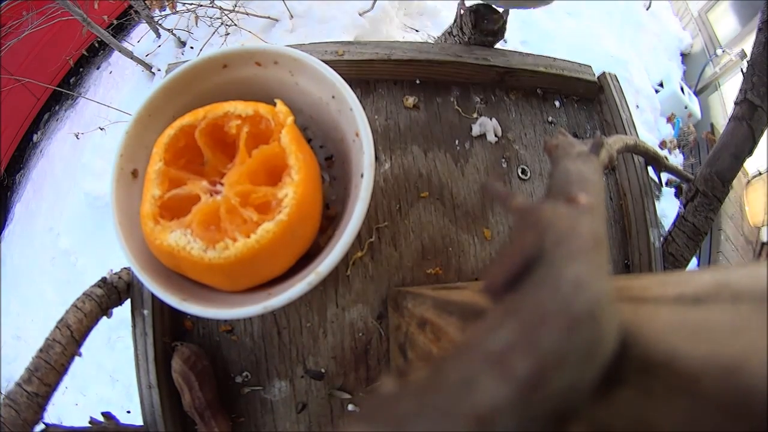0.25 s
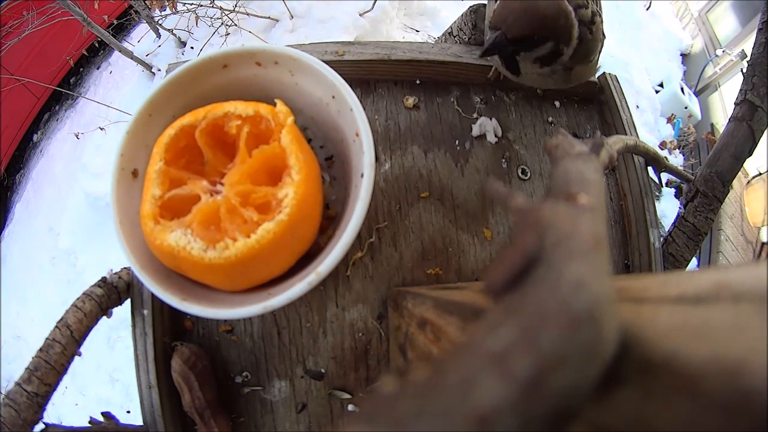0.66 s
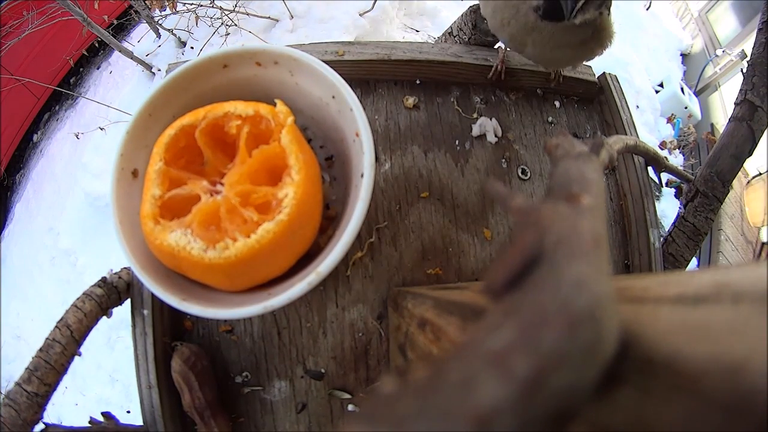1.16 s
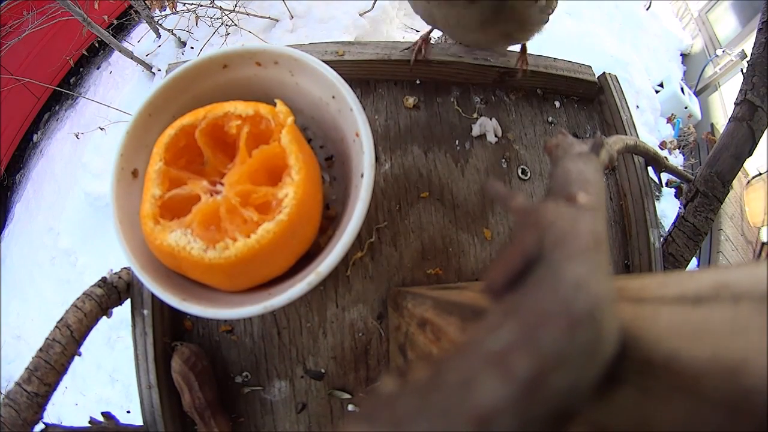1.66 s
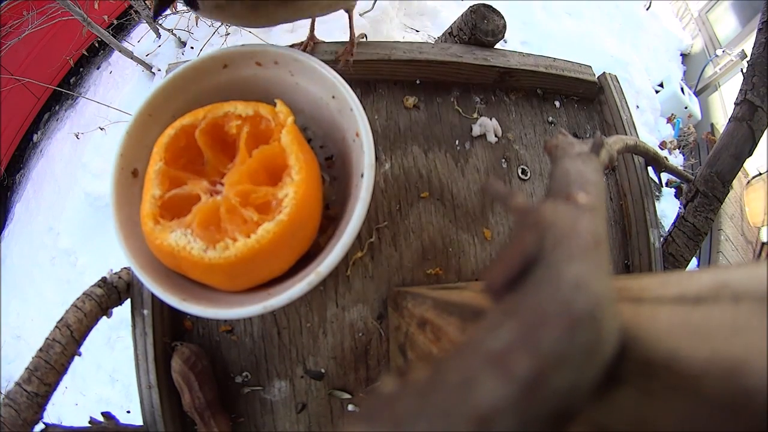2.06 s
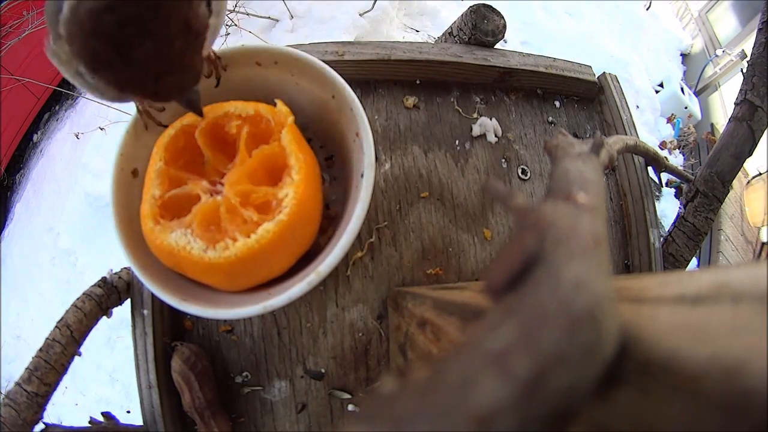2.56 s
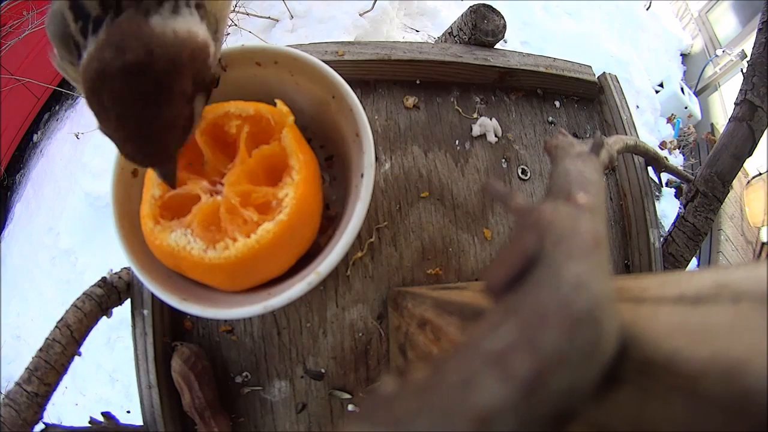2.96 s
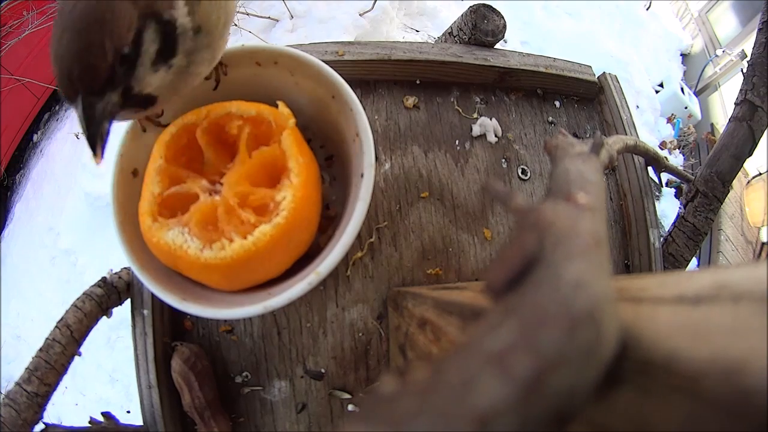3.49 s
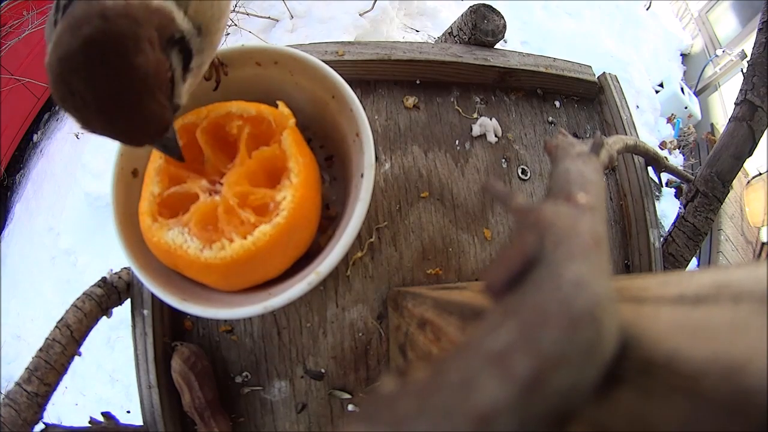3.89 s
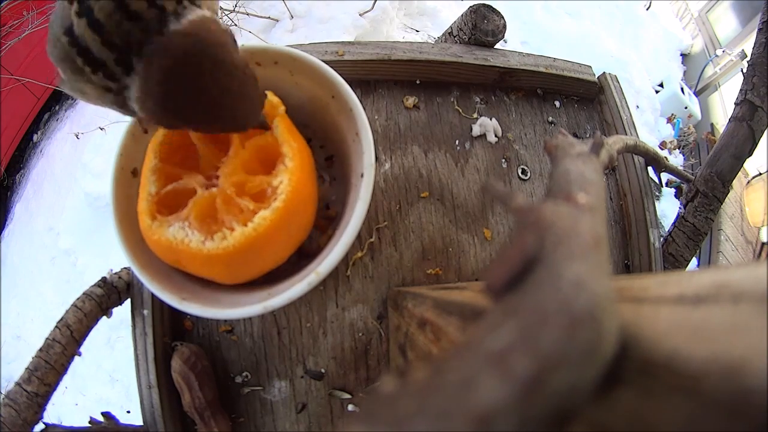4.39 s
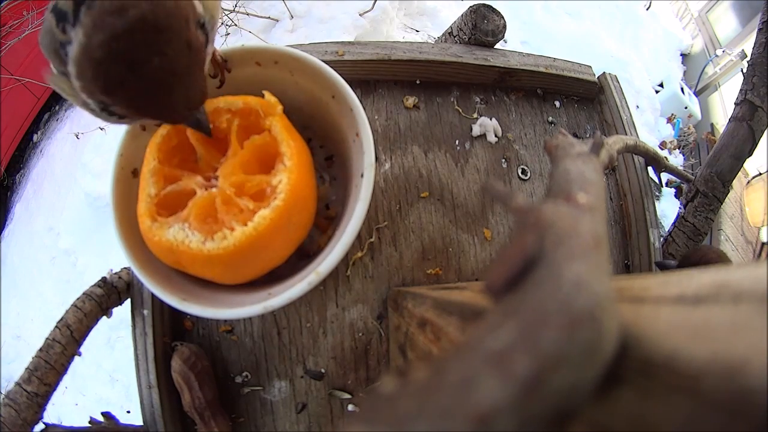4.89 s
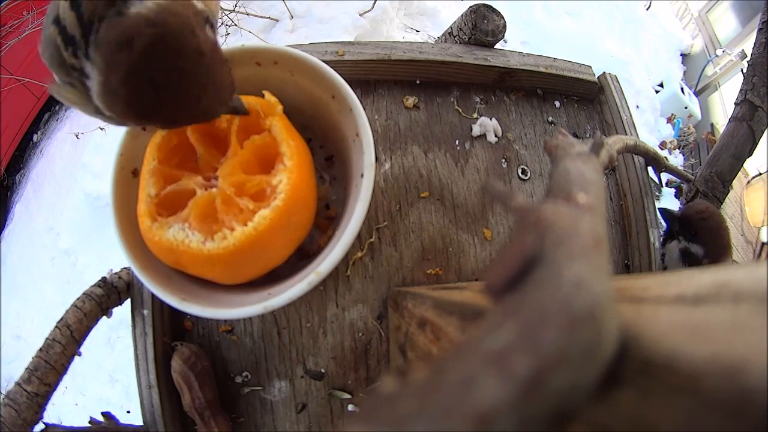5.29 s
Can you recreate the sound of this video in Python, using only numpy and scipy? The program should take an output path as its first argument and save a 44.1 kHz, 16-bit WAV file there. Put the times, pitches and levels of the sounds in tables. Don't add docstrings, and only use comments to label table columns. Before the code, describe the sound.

The first half second is silent; then quiet outdoor hiss and a faint low hum start abruptly with a small tap at 0.55 s. Soft thumps come near 0.8 and 1.0 s. From 1.6 to 1.95 s a bird hops over the wooden tray with dry, rattly clicks. At 2.05-2.4 s comes a dense run of scratching and hard, woody knocks, strongest around 2.13, ending in small bowl pings. After a pause, thumps and claw ticks crowd 2.85-3.2 s, and the heaviest double landing strikes at 3.32 s, ringing low with a slight mount jolt and buzz. Pecks thin out through 4.2; another light scramble with a late ping and low buzz fills 4.3-4.5. Few taps follow at 4.75-4.9, a very short, near, falling and wavering chirp at 4.95-5.08, and a faint far rasp at 5.3-5.45 among last ticks. Everything is close, dry and slightly dull at the top.

```python
import sys
import numpy as np
from scipy import signal
from scipy.fft import rfft, irfft, next_fast_len
from scipy.io import wavfile
from scipy.ndimage import uniform_filter1d

SR = 44100
rng = np.random.default_rng(int(sys.argv[2]) if len(sys.argv) > 2 else 0)


def magnitude_from_level(level_db):
    exponent = np.asarray(level_db, float) / 20
    return 10 ** exponent


def store_pcm(level_fs):
    pcm = np.round(np.clip(level_fs, -1, 1) * 32767).astype(np.int16)
    wavfile.write(sys.argv[1], SR, np.atleast_2d(pcm).T)


N = 244314

# frequency_hz, level_db (per Hz)
AIR_SUM = [(12, -36), (20, -5), (108, -3.5), (165, -8), (199, -3.5), (463, -6.5), (501, -3), (635, -7.5),
           (1170, -12), (11000, -19), (14300, -90), (22000, -120)]
# frequency_hz, level_db (per Hz)
AIR_DIFFERENCE = [(12, -46), (20, -18), (439, 0), (475, -1.5), (995, -1), (11000, -20.5), (14300, -55),
                  (22000, -120)]
# peak_s, level_db, rise_s, fall_s
MOUNT_BUZZES = [
    (.59, -69.5, 0.026, 0.023),
    (2.405, -53, 0.044, 0.059),
    (3.10, -61, 0.023, 0.094),
    (3.35, -54.5, 0.032, .05),
    (3.506, -51.5, 0.042, 0.021),
    (4.35, -54.5, 0.021, 0.037),
    (4.435, -44.5, 0.061, 0.079),
    (5.435, -61.5, 0.02, 0.034),
]
# start_s, level_db, pitch_hz
MOUNT_JOLTS = [
    (3.226, -44, 45.4),
    (3.26, -36, 42),
    (3.335, -35.5, 50),
]
# time_s, pitch_hz, level_db
RASP_GLIDE = [
    (5.29, 1850, -74),
    (5.33, 1970, -58.5),
    (5.37, 2140, -52),
    (5.42, 2070, -56),
    (5.47, 2010, -72),
]
# time_s, pitch_hz, partial1_db, partial2_db, partial3_db, partial4_db
CHIRP_GLIDE = [(4.953, 3760, -48, -70, -62, -75), (4.957, 3607, -23, -53, -52, -75),
               (4.961, 3457, -33, -50, -43.5, -75), (4.964, 2694, -46, -29.5, -50, -58),
               (4.968, 2445, -42, -28.5, -50, -49), (4.973, 2340, -38, -40, -54, -52),
               (4.981, 2270, -45, -31.5, -64, -53), (4.985, 2657, -47, -43, -65, -58),
               (4.992, 2954, -46, -40, -51, -75), (4.999, 2610, -41.5, -40, -50, -50),
               (5.018, 2530, -35, -46, -41, -52), (5.02, 2480, -39, -28.5, -64, -43.5),
               (5.034, 2375, -31, -36, -51, -42.5), (5.042, 2540, -47, -32, -50, -55),
               (5.046, 2650, -38, -34, -52, -51), (5.057, 3150, -44.5, -46, -44, -77),
               (5.07, 3140, -45.5, -51, -54, -75), (5.081, 2960, -55, -66, -75, -75)]
# start_s, low_tone_db, high_tone_db
BOWL_HITS = [
    (2.327, -47.5, -50),
    (2.359, -32.5, -46),
    (2.373, -43, -44),
    (2.385, -58, -43.5),
    (4.395, -42, -44),
]
# pitch_hz, time_to_fall_60_db_s
BOWL_TONES = [(3510, .12), (7260, 0.081)]
# start_s, end_s, plank_db, tray_db, rustle_db
SCRAPES = [
    (2.03, 2.335, -60, -62.5, -67),
    (3.033, 3.195, -56, -48.5, -60.5),
    (3.225, 3.412, -67, -54.5, -56.5),
    (4.315, 4.451, -61, -59.5, -58),
]
# start_s, level_db, main_tone_hz
LANDINGS = [(0.801, -41, 478), (1.009, -48, 520), (1.604, -42.5, 530), (1.641, -37, 537),
            (1.715, -39.5, 455), (1.782, -37.5, 697), (1.939, -40, 506), (2.128, -33.5, 496),
            (2.36, -27, 434), (2.85, -39, 490), (2.888, -27.5, 534), (2.951, -33.5, 506),
            (3.05, -27.5, 550), (3.062, -32, 483), (3.075, -32.5, 497), (3.098, -33.5, 560),
            (3.141, -35, 580), (3.16, -27, 493), (3.314, -18, 550), (3.321, -16.5, 526),
            (3.578, -27.5, 533), (3.95, -32.5, 461), (4.045, -35.5, 478), (4.207, -35.5, 460),
            (4.32, -40.5, 479), (4.383, -32.5, 448), (4.399, -31, 245), (4.756, -43, 317),
            (4.775, -38, 557), (4.85, -30, 468)]
# start_s, level_db, pitch_hz
DEEP_TONES = [
    (2.361, -47, 303),
    (2.905, -44.5, 382),
    (3.315, -27, 315),
    (3.322, -30.5, 238),
    (4.40, -45, 245),
]
# pitch_hz, width_hz, level_db
TRAY_TONES = [(315, 13.8, -4.5), (398, 21, -8.5), (625, 20, -7), (714, 23, -8.5), (1080, 150, -12)]
# start_s, plank_ring_db, tick_db, fizz_db, tick_pitch_hz, contact_ms
TAPS = [(0.5499, -45, -34.5, -44, 3980, 3.8), (1.5987, -41.5, -38, -48, 3270, 9.5),
        (1.6286, -62, -40, -59, 3380, 3.4), (1.6361, -32, -32, -41, 3270, 6),
        (1.7105, -33, -28.5, -37.5, 3420, 5.6), (1.7782, -26, -38.5, -35, 3600, 5.1),
        (1.8504, -43.5, -41, -45, 3560, 6.1), (1.9361, -45, -38.5, -43.5, 2920, 5.1),
        (2.0664, -46, -42.5, -57, 4930, 5.3), (2.0798, -43, -46, -61, 3560, 9.9),
        (2.092, -41.5, -41.5, -46, 3680, 8.2), (2.127, -17.5, -35.5, -48, 4000, 5.4),
        (2.1287, -22.5, -55, -53, 5250, 9.4), (2.1434, -22.5, -22, -34, 3730, 7.5),
        (2.151, -26, -21, -23, 3850, 3.6), (2.1613, -52, -60, -55, 3450, 6),
        (2.1836, -41, -48, -58, 3770, 1.8), (2.1849, -49, -46, -58, 4360, 8),
        (2.2035, -41, -32, -42.5, 3980, 6), (2.2562, -43, -43, -45, 3550, 6),
        (2.2639, -41, -48, -63, 3510, 13.7), (2.2911, -38, -44, -50, 3420, 10.3),
        (2.3023, -35, -47, -56, 3100, 15.2), (2.31, -39, -39, -52, 3200, 5.8),
        (2.3158, -39, -46, -54, 3470, 4.5), (2.3279, -46, -39, -36.5, 5900, 2.8),
        (2.359, -44, -54, -40.5, 3510, 4.9), (2.3723, -33.5, -35, -39.5, 3520, 4.4),
        (2.3844, -42, -31, -35, 3650, 0.77), (2.4034, -59, -51, -47, 3510, 3.4),
        (2.8542, -59, -41, -47, 4730, 6.8), (2.8858, -28.5, -31, -29, 2970, 2.47),
        (2.893, -39, -55, -57, 3980, 6.6), (2.9462, -45, -60, -61, 2560, 1.1),
        (3.0161, -45, -63, -49, 2530, 2.5), (3.0381, -33.5, -60, -65, 2520, 1.4),
        (3.0524, -34, -40, -39.5, 6600, 2.6), (3.057, -50, -54, -65, 2580, 8.2),
        (3.075, -39, -40, -36.5, 3300, 8), (3.0865, -34, -46, -39, 2670, 6.6),
        (3.0931, -40, -51, -41, 2580, 12), (3.1001, -47, -30.5, -54, 3070, 2.7),
        (3.115, -43, -53, -59, 6200, 2.2), (3.1238, -43, -54, -60, 4840, 0.94),
        (3.1612, -43, -39, -49, 2560, 4.1), (3.17, -45, -41, -31.5, 6660, 12.7),
        (3.199, -56, -45, -44, 3470, 3.2), (3.2319, -44.5, -48, -45, 3420, 12.4),
        (3.2431, -43.5, -48, -47, 5250, 12.4), (3.2562, -55, -47, -51, 3530, 7.8),
        (3.2638, -63, -47, -50, 3900, 8.8), (3.286, -65, -51, -49, 4840, 10),
        (3.298, -65, -45, -54, 4500, 3.8), (3.3146, -38, -21.5, -22.5, 6060, 4.3),
        (3.323, -25.5, -17, -25, 3550, 4.7), (3.3282, -44, -52, -44, 2580, 8.5),
        (3.337, -56, -51, -46, 2710, 5.1), (3.3442, -40, -36, -33.5, 3790, 2.4),
        (3.353, -42, -30.5, -40, 3000, 2.9), (3.3752, -53, -50, -46, 3340, 3.9),
        (3.4428, -46, -35, -29.5, 5000, 0.75), (3.4599, -48, -44, -62, 2670, 2.8),
        (3.4728, -47, -34, -41, 3900, 1.7), (3.5286, -54, -52, -69, 3380, 6.2),
        (3.5802, -41, -36, -38.5, 7000, 1.94), (3.6366, -58, -40, -49, 4640, 0.91),
        (3.9522, -39, -32.5, -33, 4540, 3.34), (3.965, -49, -42, -62, 3490, 1.5),
        (4.047, -44.5, -35, -39.5, 2670, 2.7), (4.0689, -49, -46, -48, 2720, 5.2),
        (4.088, -69, -48, -48, 4440, 2.7), (4.1017, -67, -54, -44, 6450, 2.3),
        (4.1421, -40, -43.5, -42, 3050, 11.7), (4.1732, -43, -58, -52, 2690, 4.7),
        (4.2038, -43, -35.5, -35.5, 4630, 4.5), (4.3148, -34.5, -38.5, -38.5, 3000, 12),
        (4.323, -48, -35, -54, 3170, 2.2), (4.331, -51, -55, -45, 4130, 2.4),
        (4.3366, -54, -49, -38, 4070, 3), (4.3467, -58, -51, -57, 5670, 1.3),
        (4.3568, -45, -38, -59, 3100, 2.0), (4.378, -45, -46, -44, 5190, 7.5),
        (4.386, -47, -45, -51, 4740, 6.3), (4.395, -42, -43, -39.5, 3600, 5.4),
        (4.4053, -48, -49, -55, 3510, 8), (4.4185, -39, -38, -49, 3170, 5),
        (4.4295, -40, -41, -42, 2970, 2.2), (4.437, -36, -58, -43, 5960, 6.6),
        (4.448, -62, -47, -48, 4800, 1.9), (4.5831, -68, -47.5, -44, 2700, 1.5),
        (4.7575, -57, -45, -53, 2670, 4.8), (4.775, -56, -45, -45, 3280, 5),
        (4.788, -52, -40, -39, 3590, 11), (4.842, -42, -39, -43, 6840, 6.4),
        (4.8493, -37, -37, -33.5, 2600, 7.1), (4.8563, -39, -54, -63, 2710, 7.2),
        (4.8873, -64, -54, -43.5, 3770, 2.6), (5.0921, -60, -46.5, -55, 3280, 2),
        (5.384, -35, -40.5, -46, 2940, 10.3), (5.4684, -66, -42, -41, 3780, 1.56),
        (5.4754, -67, -41.5, -39.5, 4670, 2.4), (5.5284, -52, -42, -40.5, 3640, 2.5)]
# start_s, level_db
SHUFFLES = [(0.5464, -33), (0.5856, -36), (1.5904, -37), (1.7594, -38), (1.7904, -32), (2.1164, -32),
            (2.2454, -37), (3.3947, -33), (4.128, -36), (4.1624, -32.5), (4.8064, -35), (4.8814, -35),
            (4.8944, -37), (5.1397, -37.5), (5.1567, -36), (5.1916, -38), (5.5364, -37)]
# start_s, end_s
AT_BOWL = [
    (2.8, 3.25),
    (3.55, 4.1),
    (4.7, 4.9),
]
# pitch_hz, width_hz, level_db
PLANK_TONES = [(1850, 260, 13.5), (1986, 67, -14), (1143, 310, 7), (1487, 155, 1.5)]
# pitch_hz, width_hz, level_db
EDGE_TONES = [(2670, 43, 1), (3360, 310, -5), (3900, 470, -6.5), (5250, 140, -4)]
# pitch_hz, width_hz, level_db
FIZZ_TONES = [(6330, 1170, 3), (7770, 770, 2), (9180, 730, 0), (10330, 1400, -6)]
# frequency_hz, phase_radians
LEFT_LEAD = [(100, 0.4), (260, 1.35), (550, 1.42), (1100, 2.12), (1900, 1.13), (4200, 0.71), (9000, 0.9)]


def evened(x):
    return x / np.sqrt(np.mean(x ** 2) + 1e-20)


def peaked(x, db):
    crest = 2 * uniform_filter1d((x ** 2).mean(0), size=44).max()
    return magnitude_from_level(db) * x / np.sqrt(crest + 1e-20)


def read(points, hz):
    f, value = np.transpose(points)
    return np.interp(np.log(hz + 1), np.log(f + 1), value)


def add(mix, start_s, sound):
    part = mix[:, round(start_s * SR):][:, :sound.shape[1]]
    part += sound[:, :part.shape[1]]


def resonate(x, hz, width_hz):
    r = np.exp(-np.pi * width_hz / SR)
    pole = r * np.exp(2j * np.pi * hz / SR)
    return 2 * signal.lfilter([1 - r], [1, -pole], x).real


def steep(x, hz, width_hz):
    return resonate(resonate(x, hz, width_hz), hz, width_hz)


def gliding(x, hz, width_hz):
    turn = np.exp(2j * np.pi * np.cumsum(hz) / SR)
    r = np.exp(-np.pi * width_hz / SR)
    return 2 * (turn * signal.lfilter([(1 - r) ** 2], [1, -2 * r, r * r], x / turn)).real


def body(x, tones):
    return sum(magnitude_from_level(db) * resonate(x, hz, width_hz) for hz, width_hz, db in tones)


def plank(force, shift=1):
    return sum(magnitude_from_level(db) * steep(force, hz * shift, width_hz) for hz, width_hz, db in PLANK_TONES)


def pair(noise, alike):
    alike = np.clip(alike, 0, 1)
    return np.array([noise[0], alike * noise[0] + np.sqrt(1 - alike ** 2) * noise[1]])


def contact(noise, contact_ms, alike):
    t_ms = np.arange(noise.shape[-1]) / SR * 1000
    rise = np.minimum(t_ms / (.3 * contact_ms), 1)
    push = np.exp(-(t_ms / (.75 * contact_ms)) ** 2)
    chatter = .09 * np.exp(-t_ms / 5)
    return pair(noise, alike) * rise * (push + chatter)


def air():
    frames, hz = N // 256 + 5, np.fft.rfftfreq(1024, 1 / SR)
    a, b, c, d, patches = rng.standard_normal((frames, 513, 5)).T
    patches = evened(uniform_filter1d(uniform_filter1d(patches, size=10, axis=0), size=10, axis=1))
    shared = (a + 1j * b) * magnitude_from_level(read(AIR_SUM, hz))[:, None]
    differing = (c + 1j * d) * magnitude_from_level(read(AIR_DIFFERENCE, hz))[:, None]
    spectra = np.array([shared, differing]) * magnitude_from_level(0.27 * patches)
    mid, side = signal.istft(spectra, nperseg=1024, noverlap=768)[1][:, :N]
    mid, side = magnitude_from_level(-60) * evened(mid), magnitude_from_level(-58.5) * evened(side)

    hum_hz, hum_db = 200.5, -71.5
    pitch_waver, level_waver = evened(uniform_filter1d(rng.standard_normal((2, N)), size=5000))
    turns = 2 * np.pi * np.cumsum(hum_hz + 2.17 * pitch_waver) / SR
    hum_level = np.sqrt(2) * magnitude_from_level(hum_db + 1.5 * level_waver)
    hum = hum_level * np.sin(turns + np.array([[.2], [-.2]]))
    return np.array([mid + side, mid - side]) + hum


def shakes():
    t = np.arange(N) / SR
    wobble = evened(uniform_filter1d(rng.standard_normal(N), size=900))
    turns = 2 * np.pi * np.cumsum(136 * (1 + .07 * wobble)) / SR
    swell = 0
    for peak_s, db, rise_s, fall_s in MOUNT_BUZZES:
        spread_s = np.where(t < peak_s, rise_s, fall_s)
        swell = swell + magnitude_from_level(db) * np.exp(-((t - peak_s) / spread_s) ** 2)
    swell *= magnitude_from_level(2.5 * np.roll(wobble, SR))
    out = np.sqrt(2) * swell * np.sin(turns + np.array([[-.4], [.4]])) * magnitude_from_level([[-1.2], [1.2]])
    for start_s, db, hz in MOUNT_JOLTS:
        cycle = t[:4000] * hz
        fade = np.sin(np.pi * np.minimum(cycle / 1.04, 1))
        jolt = -magnitude_from_level(db) * np.sin(2 * np.pi * cycle) * fade
        add(out, start_s - .5 / hz, np.tile(jolt, (2, 1)))
    return out


def rasp():
    time_s, hz, db = np.transpose(RASP_GLIDE)
    t = np.arange(time_s[0], time_s[-1], 1 / SR)
    noise = rng.standard_normal((6, SR // 4))
    throb = evened(uniform_filter1d(noise[2:], size=300))[:, :len(t)]
    breath = pair(noise, 0.83)[:, :len(t)]
    pitch = np.interp(t, time_s, hz) * (1 + 0.022 * throb[3])
    voice = 0
    for k, (partial_db, width_hz) in enumerate([(-2.2, 770), (0.72, 390), (-0.47, 680)]):
        voice = voice + magnitude_from_level(partial_db + 1.8 * throb[k]) * gliding(breath, (k + 1) * pitch, width_hz)
    out = np.zeros((2, N))
    add(out, time_s[0], evened(voice) * magnitude_from_level(np.interp(t, time_s, db)))
    return out


def chirp():
    time_s, hz, *levels_db = np.transpose(CHIRP_GLIDE)
    t = np.arange(time_s[0], time_s[-1], 1 / SR)
    noise = rng.standard_normal((5, SR // 4))
    flutter = [evened(uniform_filter1d(row, size=90))[:len(t)] for row in noise]
    pitch = uniform_filter1d(np.interp(t, time_s, hz), size=30) * (1 + 0.0075 * flutter[4])
    turns = 2 * np.pi * np.cumsum(pitch) / SR
    voice = 0
    for k, db in enumerate(levels_db):
        voice = voice + magnitude_from_level(np.interp(t, time_s, db) + 1.54 * flutter[k]) * np.sin((k + 1) * turns)
    breaking = magnitude_from_level(-51) * np.exp(-((t - 4.99) / .0065) ** 4)
    for k in (1, 2, 4, 5):
        third = np.sin(k * turns / 3 + k * k)
        voice += breaking * min(k, 2) * third * (1 + .4 * flutter[k % 4])
    out = np.zeros((2, N))
    add(out, time_s[0], np.sqrt(2) * voice * magnitude_from_level([[-.6], [.6]]))
    return out


def bowl():
    out, t = np.zeros((2, N)), np.arange(8000) / SR
    for start_s, *levels_db in BOWL_HITS:
        for db, (hz, t60_s) in zip(levels_db, BOWL_TONES):
            tone = magnitude_from_level(db - 60 * t / t60_s) * np.sin(2 * np.pi * hz * t)
            add(out, start_s, np.tile(tone, (2, 1)))
    return out


def scrapes():
    out = np.zeros((2, N))
    for (start_s, end_s, *levels_db), noise in zip(SCRAPES, rng.standard_normal((8, 3, SR // 2))):
        size = round((end_s - start_s) * SR)
        unevenness = evened(uniform_filter1d(noise[2], size=120))
        slips = pair(noise[:2], 0.68) * magnitude_from_level(4.2 * unevenness)
        tray = 2 * steep(slips, 524, 440) + steep(slips, 1040, 1150)
        rustle = body(slips, EDGE_TONES + FIZZ_TONES)
        parts = plank(slips), tray, rustle
        scrape = sum(magnitude_from_level(db) * evened(part) for db, part in zip(levels_db, parts))
        add(out, start_s, scrape[:, :size] * signal.windows.tukey(size, .15))
    return out


def knocks():
    out = np.zeros((2, N))
    blunt = np.pad(np.hanning(24), (0, 5976))
    for (start_s, db, hz), noise in zip(LANDINGS, rng.standard_normal((50, 2, 6000))):
        push = blunt + 0.83 * contact(noise, 2.3, 0.85)
        add(out, start_s, peaked(resonate(push, hz, 39.6) + body(push, TRAY_TONES), db))
    for start_s, db, hz in DEEP_TONES:
        deep = resonate(blunt, hz, 0.048 * hz) * magnitude_from_level([[-3.], [3.]])
        add(out, start_s, peaked(deep, db))
    return out


def taps():
    light = [(start_s, db - 18, db - 14, db - 15, 3700, 3) for start_s, db in SHUFFLES]
    out = np.zeros((2, N))
    for tap, noise in zip(TAPS + light, rng.standard_normal((200, 3, 2, 1400))):
        start_s, ring_db, tick_db, fizz_db, tick_hz, contact_ms = tap
        force = contact(noise[0], max(contact_ms - 1.5, .5), 0.9)
        if any(a < start_s < b for a, b in AT_BOWL):
            ring = plank(force, 1.1) + magnitude_from_level(-13) * resonate(force, 1560, 490)
        else:
            ring = plank(force)
        force = contact(noise[1], contact_ms, 0.86)
        tick = steep(force, tick_hz, 740) + body(force, EDGE_TONES)
        fizz = body(contact(noise[2], 1.2 * contact_ms, 0.84), FIZZ_TONES)
        sound = peaked(ring, ring_db) + peaked(tick, tick_db) + peaked(fizz, fizz_db)
        add(out, start_s - .00015 * contact_ms, sound)
    return out


def surroundings(x):
    t = np.arange(4400) / SR
    tail = rng.standard_normal((2, 4400)) * magnitude_from_level(-60 * t / 0.079) * (t > .002)
    return signal.fftconvolve(x.mean(0)[None], tail / np.linalg.norm(tail[0]), axes=1)[:, :N]


def ports(x):
    size = next_fast_len(N + 2048)
    half = np.exp(.5j * read(LEFT_LEAD, np.fft.rfftfreq(size, 1 / SR)))
    return irfft(rfft(x, size) * np.array([half, half.conj()]), size)[:, :N]


def scene():
    high_pass = signal.butter(2, 800, "high", fs=SR, output="sos")
    thump_band = signal.butter(2, [190, 1300], "band", fs=SR, output="sos")
    light = signal.sosfilt(high_pass, taps())
    heavy = signal.sosfilt(thump_band, knocks())
    near = light + scrapes() + bowl() + chirp() + rasp()
    echoes = magnitude_from_level(-13) * surroundings(near)
    return ports(near + heavy) + echoes + shakes() + air()


def low_pass(x):
    return signal.sosfilt(signal.butter(12, 12270, fs=SR, output="sos"), x)


def record(dry):
    edge_hz, start_s = 11150, .5468
    sharp = signal.firwin(255, edge_hz, window=("kaiser", 7), fs=SR)
    soft = np.pad(signal.firwin(41, edge_hz + 400, window=("kaiser", 5), fs=SR), 107)
    leak = magnitude_from_level(-20)
    limited = signal.oaconvolve(dry, ((1 - leak) * sharp + leak * soft)[None], "same")
    started = np.arange(N) > start_s * SR
    return low_pass(limited * started)


dry = scene()
out = record(dry)
store_pcm(out)
```